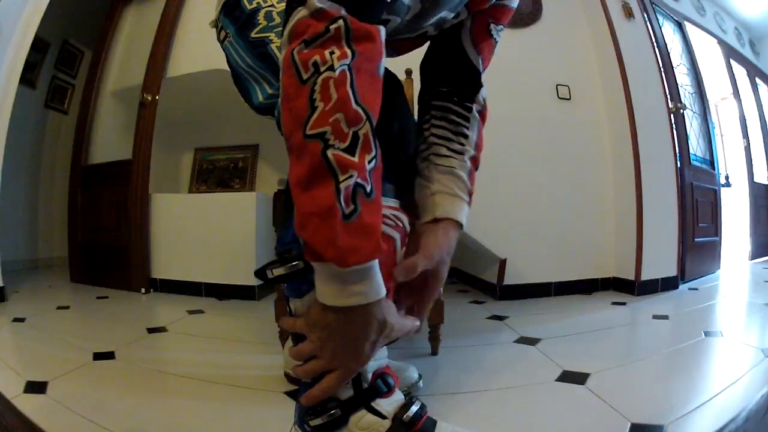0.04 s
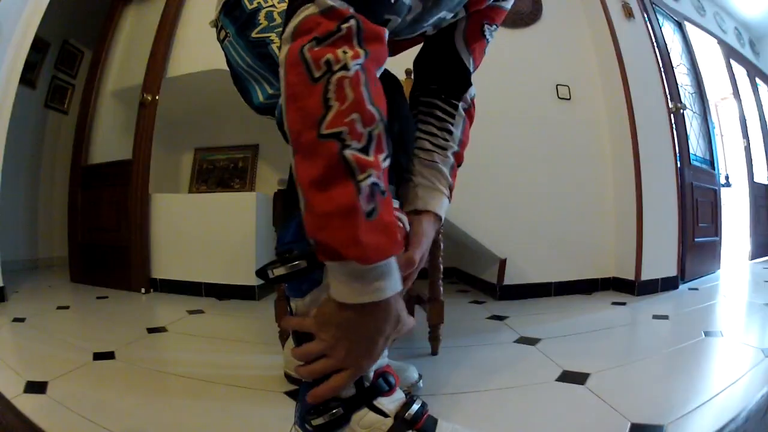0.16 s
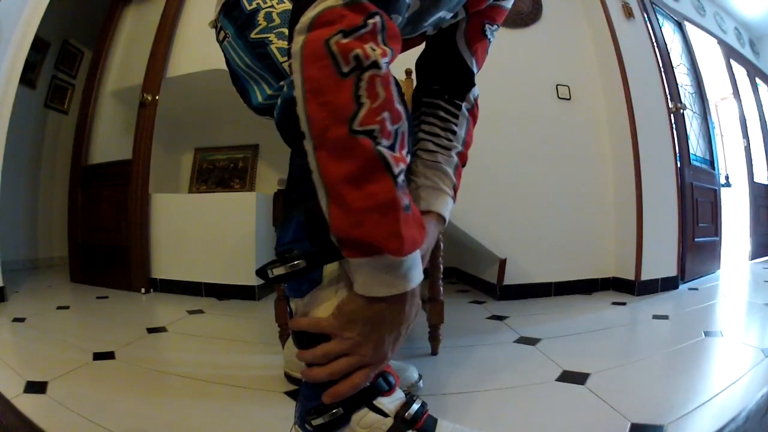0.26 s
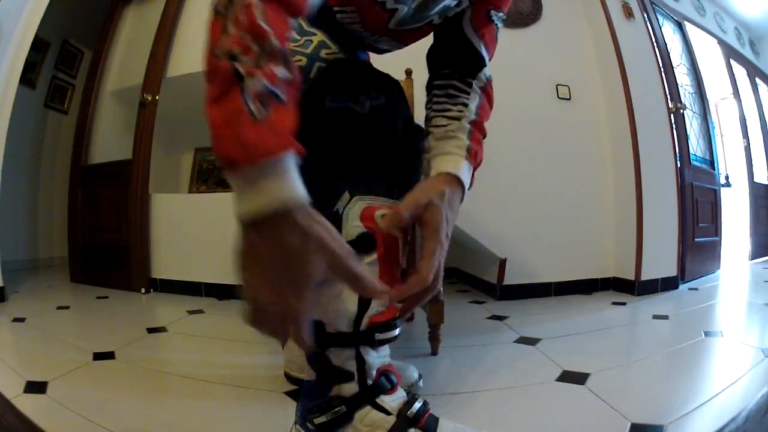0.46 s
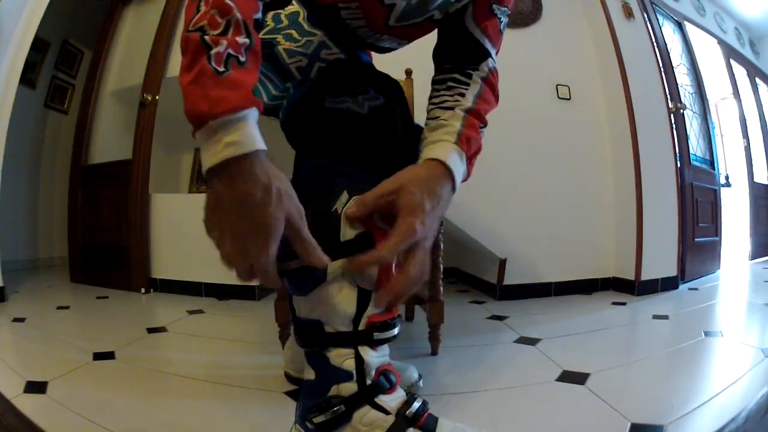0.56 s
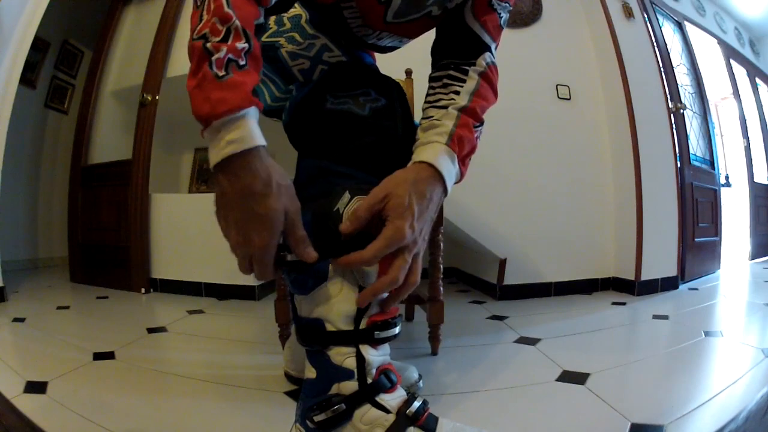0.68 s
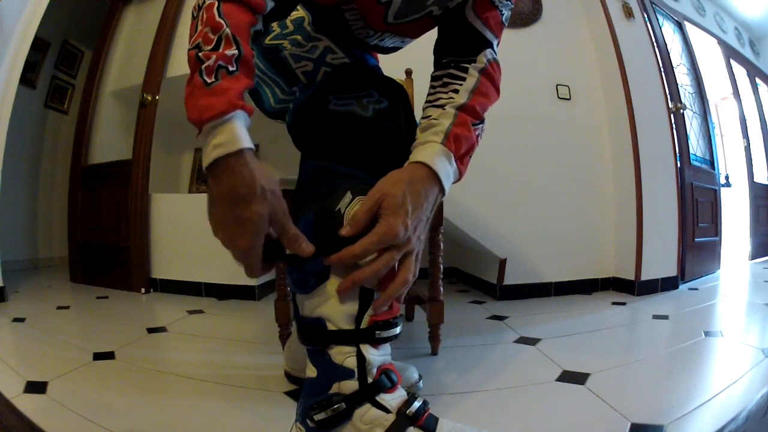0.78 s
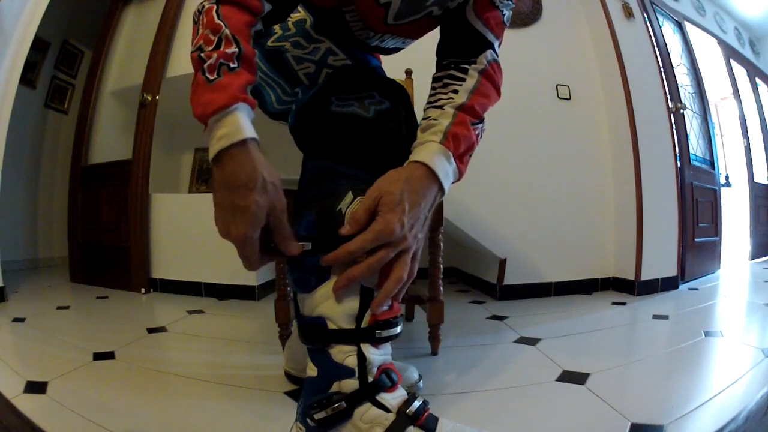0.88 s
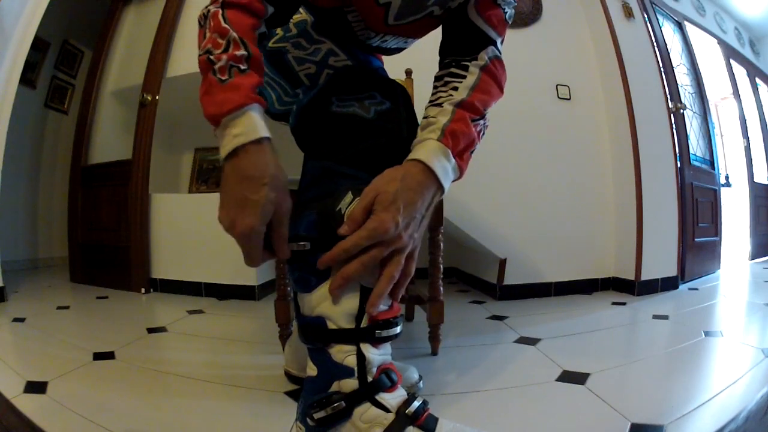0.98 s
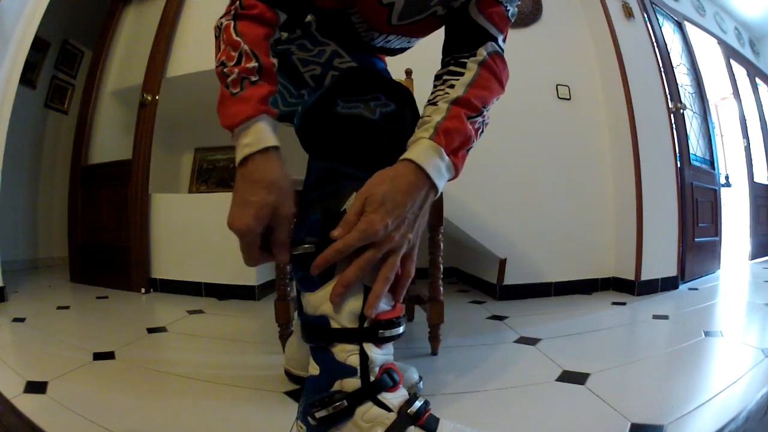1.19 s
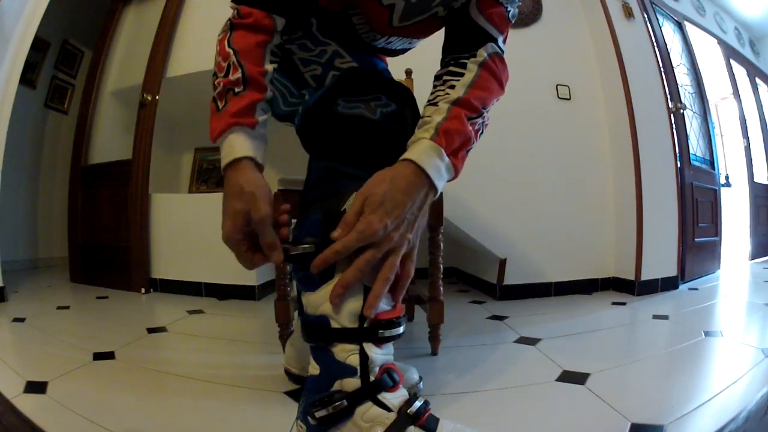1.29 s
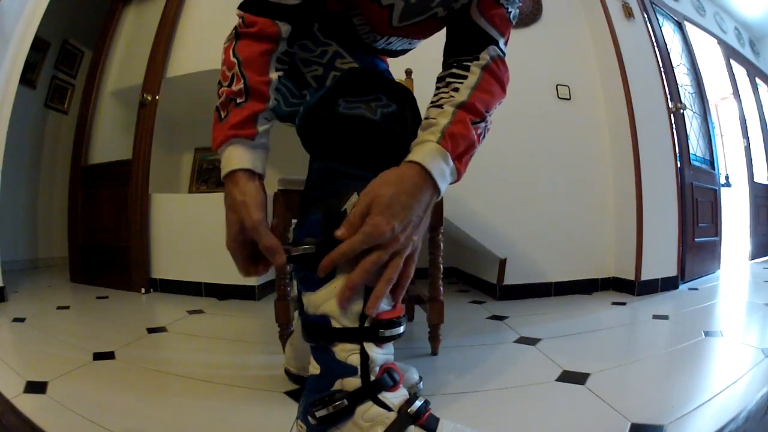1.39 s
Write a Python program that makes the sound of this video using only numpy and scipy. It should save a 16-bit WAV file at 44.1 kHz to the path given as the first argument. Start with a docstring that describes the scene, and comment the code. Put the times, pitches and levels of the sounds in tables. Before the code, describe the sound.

Boot buckles fastened close to a small microphone in a quiet tiled hall. Muffled thumps and leather rubbing from 0.05 to 0.22 seconds, then one very loud, bright plastic snap at 0.24 with a short ringing echo and a cloth swish around 0.3. A light click at 0.5, faint clustered ticks from 0.62 to 0.97, then firmer knocks at 1.13, 1.2 and 1.29, over faint low room air.

```python
"""A small tiled hall: hands work the plastic buckles of a riding boot, with a small camera on the floor.
One buckle snaps shut hard, others tick and knock: short contacts ring damped modes of buckle and shell.
Three first echoes and a decaying noise tail follow every click.
Leather and cloth rustle as grainy, fluttering noise; the air of the hall is steady coloured noise.
"""
import sys
import numpy as np
from scipy import signal
from scipy.fft import rfft, irfft, next_fast_len
from scipy.io import wavfile
from scipy.ndimage import uniform_filter1d, map_coordinates

SR = 44100
rng = np.random.default_rng(int(sys.argv[2]) if len(sys.argv) > 2 else 0)


def bounce(signal):
    """Save signal as a 16-bit WAV file at the path given by the first command-line argument."""
    frames = np.transpose(np.atleast_2d(signal))
    limited = np.clip(frames, -1, 1)
    pcm = np.round(limited * 32767).astype(np.int16)
    wavfile.write(sys.argv[1], SR, pcm)


N = 63945  # length in samples


def amp(db):
    """dB to linear amplitude."""
    return 10 ** (np.asarray(db) / 20)


def unit(x):
    """Scale to rms 1."""
    return x / np.sqrt(np.mean(x ** 2) + 1e-20)


def along(points, hz):
    """Interpolate (Hz, value) points on a log frequency axis."""
    point_hz, value = np.transpose(points)
    return np.interp(np.log(hz + 1), np.log(point_hz + 1), value)


def filtered(x, response):
    """Multiply the spectrum of x by a complex response of frequency."""
    size = next_fast_len(len(x) + 8192)
    hz = np.fft.rfftfreq(size, 1 / SR)
    return irfft(rfft(x, size) * response(hz), size)[:len(x)]


def wobble(knots_per_s):
    """Smooth random curve: a spline through normal draws."""
    knots = rng.standard_normal(int(N * knots_per_s / SR) + 4)
    return map_coordinates(knots, [np.arange(N) * knots_per_s / SR])


# Spectrum of the quiet hall. Each row: frequency in Hz, relative density in dB per Hz.
AIR_SPECTRUM = [(15, -16), (30, -3), (60, 8), (120, 6.5), (400, 4), (1000, -6.5), (3000, -18),
                (8000, -26.5), (15000, -46), (17000, -46)]
AIR_RMS_DB = -59


def hall_air():
    """Steady noise of the quiet hall, strongest in the bass."""
    noise = filtered(rng.standard_normal(N), lambda f: amp(along(AIR_SPECTRUM, f)))
    return amp(AIR_RMS_DB) * unit(noise)


GRAINS_PER_S, GRAIN_SPREAD_DB = 900, 2
GRAIN_POWER_SHARE = .4
FLUTTER_DB, FLUTTER_KNOTS_PER_S = 2, 39.15


def rubbing(spectrum):
    """Friction as noise mixed with grains of uneven size, coloured and fluttering; rms 1."""
    hits = rng.random(N) < GRAINS_PER_S / SR
    grains = hits * rng.standard_normal(N) * amp(GRAIN_SPREAD_DB * rng.exponential(size=N))
    mix = np.sqrt(GRAIN_POWER_SHARE) * unit(grains)
    mix = mix + np.sqrt(1 - GRAIN_POWER_SHARE) * rng.standard_normal(N)
    coloured = filtered(mix, lambda f: amp(along(spectrum, f)))
    return unit(coloured * amp(FLUTTER_DB * wobble(FLUTTER_KNOTS_PER_S)))


# Rustle levels, joined linearly. Each row: time in seconds, leather level in dB, cloth level in dB.
RUSTLE_LEVELS = [(0, -63, -62), (0.051, -63, -60.5), (.08, -46.5, -56.5), (0.152, -55.5, -62.5),
                 (0.211, -49, -63), (0.298, -80, -37.5), (0.602, -82, -60.5), (0.759, -58, -115),
                 (0.828, -58, -59), (.92, -62, -69.5), (0.968, -57.5, -69), (1.051, -71, -104.5),
                 (1.11, -89, -97.5), (1.17, -48.5, -87), (1.32, -95, -68), (1.45, -58.5, -72)]
# Spectrum of rubbed leather. Each row: frequency in Hz, relative density in dB per Hz.
LEATHER_SPECTRUM = [(59, -46), (100, 2), (185, 6), (639, 1.5), (698, 2.5), (2000, -17), (2600, -59),
                    (4400, -120)]
# Spectrum of rubbed cloth. Each row: frequency in Hz, relative density in dB per Hz.
CLOTH_SPECTRUM = [(880, -32), (1500, -0.5), (2430, -4), (4860, -8), (12000, -31), (15000, -18)]


def leather_and_cloth():
    """Two rubbing noises: leather creaks low, cloth whispers high."""
    s, leather_db, cloth_db = np.transpose(RUSTLE_LEVELS)
    t = np.arange(N) / SR
    leather = amp(np.interp(t, s, leather_db)) * rubbing(LEATHER_SPECTRUM)
    cloth = amp(np.interp(t, s, cloth_db)) * rubbing(CLOTH_SPECTRUM)
    return leather + cloth


# Decay of the hall. Each row: frequency in Hz, t60 in seconds.
HALL_T60 = [(100, 0.56), (260, .68), (700, 0.7), (1840, 0.42), (4850, 0.48), (12800, 0.58)]
# Strength of the hall's tail. Each row: frequency in Hz, level in dB against the click's energy.
HALL_COLOUR_DB = [(60, -22), (150, -2), (300, -4), (800, -7), (2000, -9.5), (4500, -2.5), (8000, -6.5),
                  (14000, -2)]
HALL_ONSET_S = 0.0015


def hall_tail(colour):
    """Fresh diffuse noise tail in the click's broad colour; each frequency dies at its own speed."""
    hz, t, z = signal.stft(rng.standard_normal(SR), SR, nperseg=256)
    t60_s = np.clip(along(HALL_T60, hz), .1, 2)[:, None]
    x = signal.istft(z * amp(-60 * t / t60_s), SR, nperseg=256)[1]
    x = filtered(x / np.linalg.norm(x), lambda f: colour(f) * amp(along(HALL_COLOUR_DB, f)))
    return x * (1 - np.exp(-(np.arange(len(x)) / SR / HALL_ONSET_S) ** 2))


PUSH_CYCLES = 3.2  # waves of fewer cycles per contact feel one clean push
RISE_SHARE = .3  # build-up as a share of the contact length


def contact(ms):
    """Contact force of a few ms: one clean push in the bass, rough noise above, spectrum near flat."""
    t_ms = np.arange(4096) / SR * 1000
    ms = max(ms, .2)
    rise = 1 - np.exp(-(t_ms / (RISE_SHARE * ms)) ** 2)
    noise = rfft(rng.standard_normal(len(t_ms)) * rise * np.exp(-2 * t_ms / ms))
    noise = noise / np.sqrt(uniform_filter1d(abs(noise) ** 2, size=14))
    khz = np.fft.rfftfreq(len(t_ms), 1000 / SR)
    push = np.exp(-2j * np.pi * khz * RISE_SHARE * ms)  # an impulse at the end of the rise
    rough = np.arctan((khz * ms / PUSH_CYCLES) ** 2)  # crossfade angle
    return irfft(np.sin(rough) * noise + np.cos(rough) * push) * (t_ms < 20)


# Modes of buckle and boot shell. Each row: frequency in Hz, width in Hz, base gain in dB.
BUCKLE_MODES = [(40.4, 78, 3.5), (284.6, 186, 1.5), (657, 183, -0.5), (904, 137, -3), (1104, 280, 0),
                (1520, 410, -6.5), (1763, 173, -2), (2456, 120, 0.5), (2850, 240, -0.5), (3397, 160, 0),
                (3876, 240, 0), (4270, 310, -1.5), (5060, 490, 0.5), (6380, 310, 2.5), (7820, 270, 0.5),
                (9700, 470, -31), (12040, 950, 4), (14500, 1400, -4)]
FAVOUR_DB, FAVOUR_OCTAVES = 8, .14  # boost around the favoured pitch
MODE_SCATTER_DB = 1.5


def click(colour, ms, favoured_hz):
    """A contact rings the damped modes; each mode falls off steeply above its pitch."""
    force = contact(ms)
    hz, width, db = np.transpose(BUCKLE_MODES)[:, :, None]
    octaves_off = np.log2(hz / favoured_hz)
    db = db + FAVOUR_DB * np.exp(-(octaves_off / FAVOUR_OCTAVES) ** 2)
    db = db + MODE_SCATTER_DB * rng.standard_normal(hz.shape)
    gain = colour(hz) * amp(db)

    def modes(f):
        resonance = 1j * f * width / (hz ** 2 - f ** 2 + 1j * f * width)
        lowpass = (1 + 1j) / (1 + 1j * f / hz)
        return np.sum(gain * resonance * lowpass, axis=0)
    return filtered(force, modes)


# Band centres of the click levels, thud to fizz, in Hz.
CLICK_BANDS_HZ = [270, 620, 1050, 2100, 4200, 7300, 11500]
SUB_HZ, SUB_DB = 39, -6  # push of air under each thud, dB against the lowest band


def click_colour(band_db):
    """Broad spectrum of one click as a gain function of frequency."""
    points = list(zip([SUB_HZ] + CLICK_BANDS_HZ, [band_db[0] + SUB_DB] + band_db))
    return lambda f: amp(along(points, f))


# Buckle clicks. Each row: start in seconds, energy in dB in each of the seven bands from thud to fizz,
# contact length in ms, frequency in Hz near which modes are struck hardest.
BUCKLE_CLICKS = [(0.053, 7, 4, -12, -29, -25, -20.5, -23, 10.2, 534),
                 (0.082, 0.5, -9, -45, -45, -48, -29, -29.5, 3.6, 327),
                 (0.171, 10.5, 0, 4, -39, -37, -17, -16.5, 4.3, 1065),
                 (0.183, -4, -26, -4, -32, -33, -41, -40, 9.9, 262),
                 (0.202, -12, -28, -30, -38, -34, -41, -51, 5.7, 255),
                 (0.215, -0.5, -33, -34, -44, -49, -50, -47, 4.7, 264),
                 (0.2413, 21.5, 24.5, 22.5, 20, 15, 18, -3, 1.2, 4000),
                 (0.491, -17, -6, -8, -4.5, -14, -12.5, -22.5, 2.75, 1206),
                 (0.6238, -7, -8.5, -12.5, -8, -23, -21, -30, 6, 890),
                 (0.6501, -19, -32, -33, -6, -14, -14.5, -35.5, 2.4, 4160),
                 (0.6893, -27, -18.5, -25, -12, -56, -30, -29, 2.4, 1810),
                 (0.7735, -46, -28, -31, -16.5, -46, -26, -33, 3.3, 2470),
                 (0.7894, -19, -11.5, -26, -52, -33, -52, -44, 1.4, 850),
                 (0.798, -22, -9, -26, -10.5, -20.5, -16.5, -29, 3.9, 2640),
                 (0.8135, -19, -13, -30, -8, -20, -19, -31, 3.5, 4440),
                 (0.8214, -32, -27, -36, -16, -29, -21, -38, 3.3, 5230),
                 (0.8323, -5, -17, -39, -20, -45, -41, -43, 1.9, 565),
                 (0.856, -19, -5.5, -31, -13.5, -23, -25, -29, 2.9, 2430),
                 (0.8698, -28, -39, -44, -16, -39, -34, -36, 2.5, 2430),
                 (0.9416, -14.5, -7.5, -21, -17, -34, -24, -36, 1.1, 557),
                 (0.9589, -8, -13.5, -30, -6, -21, -21, -28, 5.4, 1890),
                 (0.9715, -11.5, -26, -15.5, -28, -26, -34, -38, 2.2, 3350),
                 (1.067, -18, -29, -40, -27, -40.5, -57, -42, 3.2, 2410),
                 (1.1293, -1.5, 2, -2.5, -8.5, -23, -22, -20, 1.04, 1670),
                 (1.1437, -6, -11, -20, -11, -19.5, -29, -33, 5.6, 620),
                 (1.1503, -28, -16, -24, -33, -27, -20.5, -49, 2.5, 4700),
                 (1.1995, 1, -1, -4, -5, -11, -13.5, -25, 3.4, 1850),
                 (1.2893, 5.5, -2, -3.5, -10, -9.5, -11.5, -26.5, 3.07, 2800),
                 (1.417, -26, -19, -25, -20, -34, -36, -36, 2.05, 1160)]
# First echoes off the walls. Each row: delay in seconds, level in dB.
WALL_ECHOES = [(.0035, -19.5), (.0095, -13), (.017, -15.5)]


def buckles():
    """Every click with its first echoes and the hall's tail."""
    out = np.zeros(N + 2 * SR)
    for start_s, *band_db, ms, favoured_hz in BUCKLE_CLICKS:
        colour = click_colour(band_db)
        direct = click(colour, ms, favoured_hz)
        parts = [(0, direct), (0, hall_tail(colour))]
        parts += [(delay_s, amp(db) * direct) for delay_s, db in WALL_ECHOES]
        for delay_s, part in parts:
            out[round((start_s + delay_s) * SR):][:len(part)] += part
    return out[:N]


def scene():
    """Sum of hall air, rustle and buckles, one channel."""
    return (hall_air() + leather_and_cloth() + buckles())[None]


# Notches of the camera housing. Each row: frequency in Hz, width in Hz, depth from 0 to 1.
HOUSING_NOTCHES = [(6050, 850, .84), (12020, 800, .98)]
ROLL_HZ, ROLL_DB_PER_KHZ, TOP_HZ = 15250, 30, 16500
FULL_SCALE, KNEE = .82, 4  # ceiling in amplitude, sharpness of the saturation


def record(dry):
    """Input saturates softly, housing cuts two notches, treble rolls off and ends at the band limit."""
    def colour(f):
        notch = np.prod([1 - depth * 1j * f * width / (hz * hz - f * f + 1j * f * width)
                         for hz, width, depth in HOUSING_NOTCHES], axis=0)
        roll = amp(-ROLL_DB_PER_KHZ * np.clip(f - ROLL_HZ, 0, None) / 1000)
        return notch * roll * (f < TOP_HZ)
    saturated = dry[0] / (1 + abs(dry[0] / FULL_SCALE) ** KNEE) ** (1 / KNEE)
    return filtered(saturated, colour)[None]


dry = scene()
out = record(dry)
bounce(out)
```